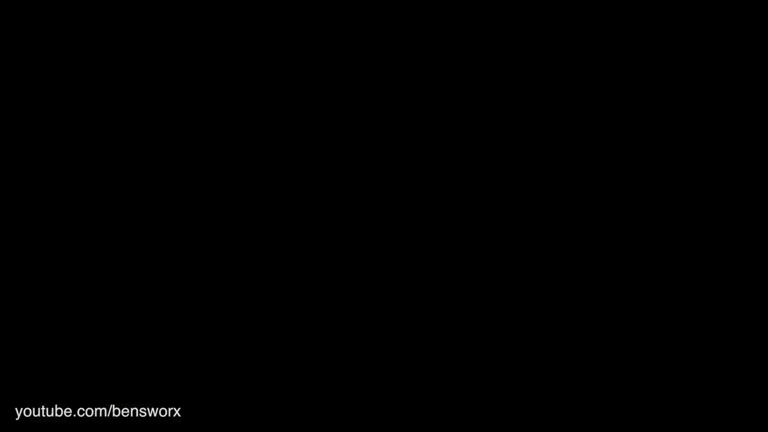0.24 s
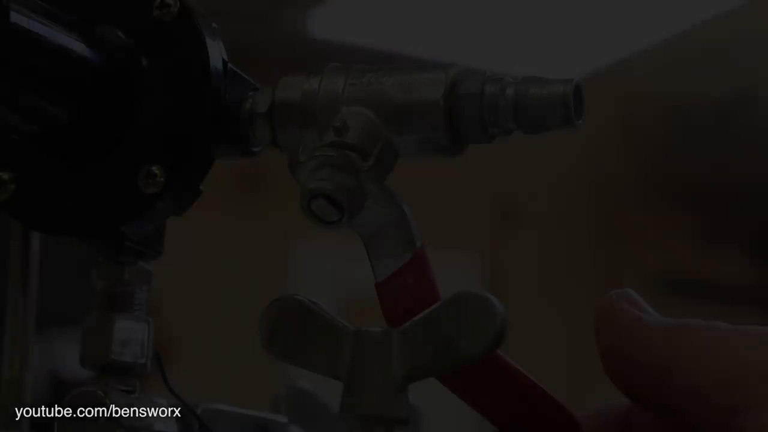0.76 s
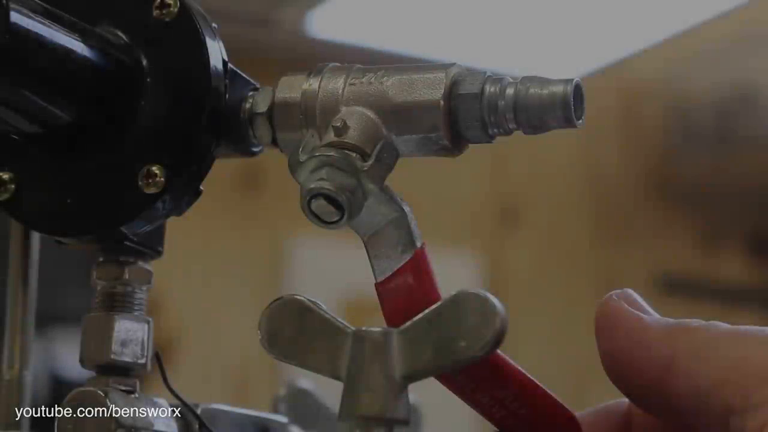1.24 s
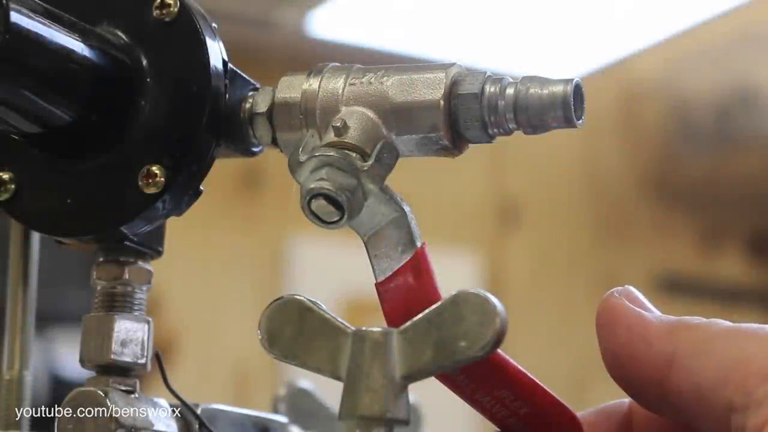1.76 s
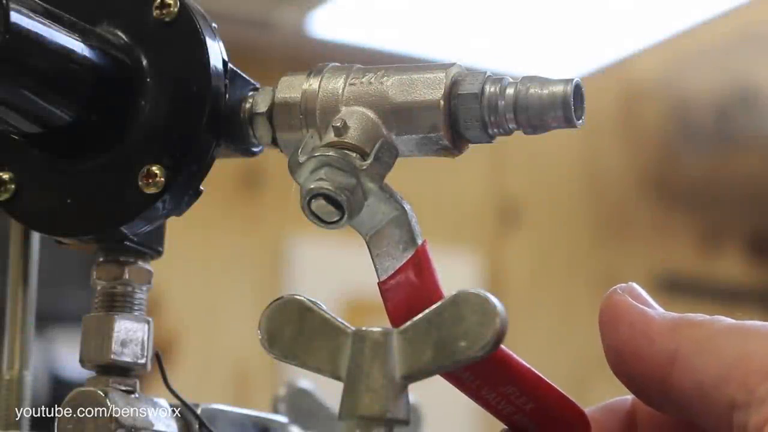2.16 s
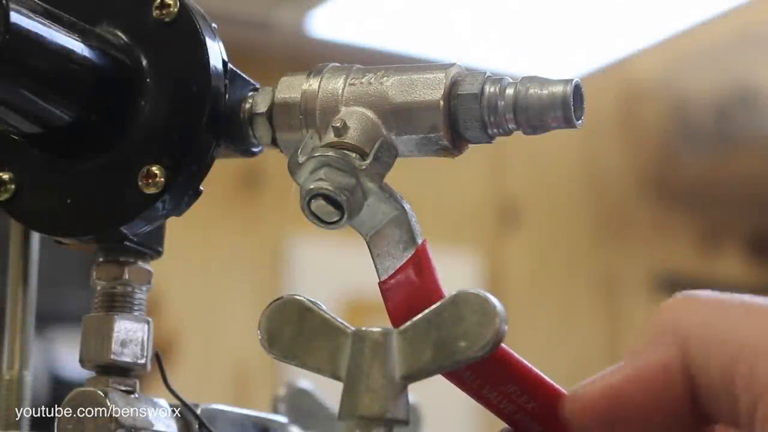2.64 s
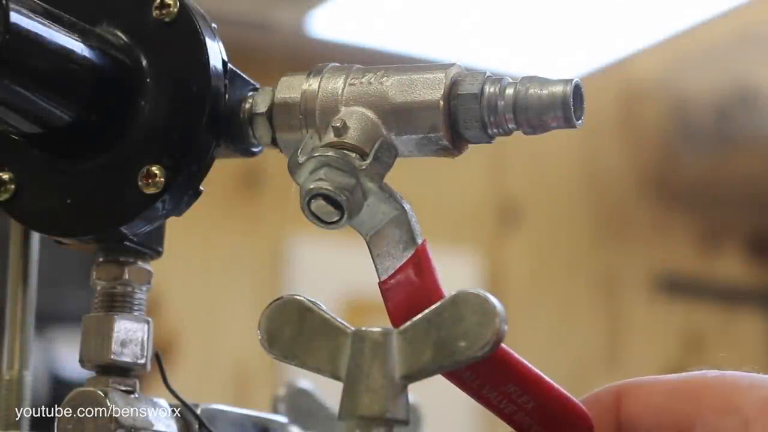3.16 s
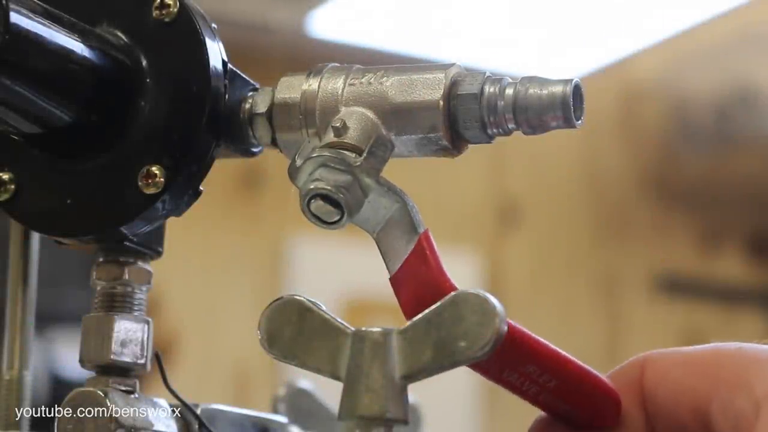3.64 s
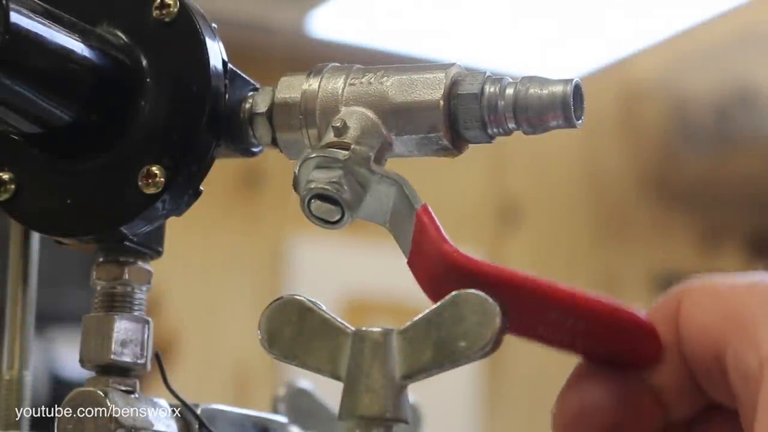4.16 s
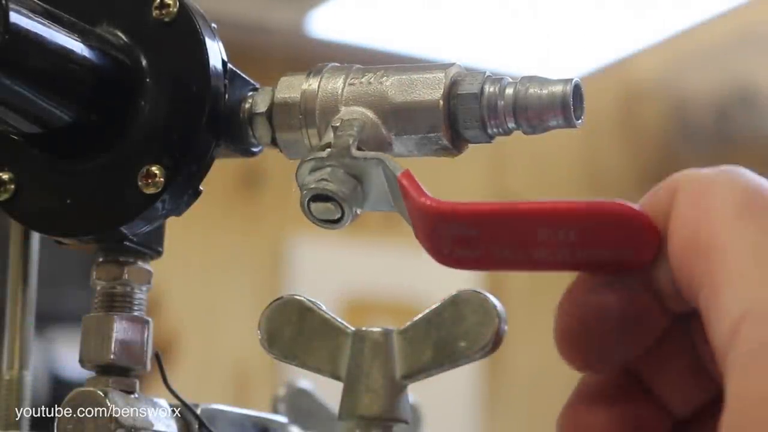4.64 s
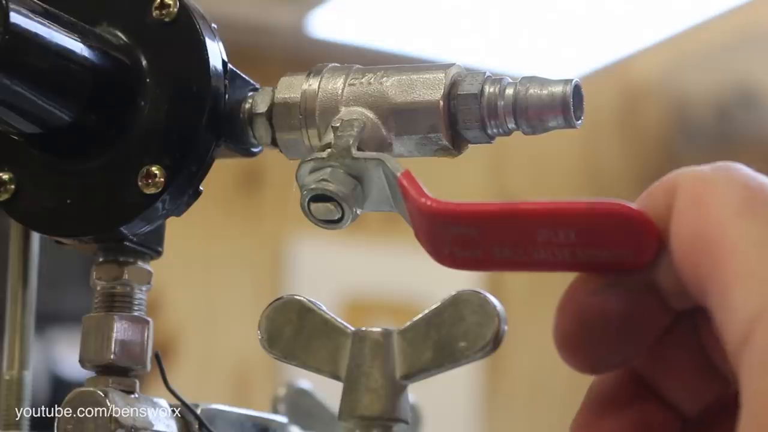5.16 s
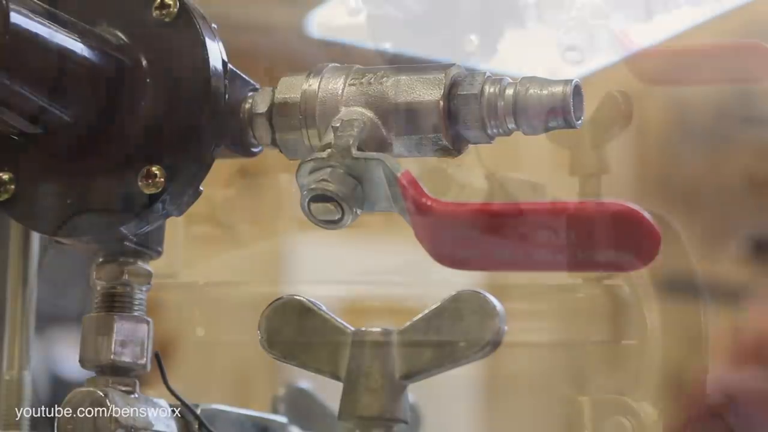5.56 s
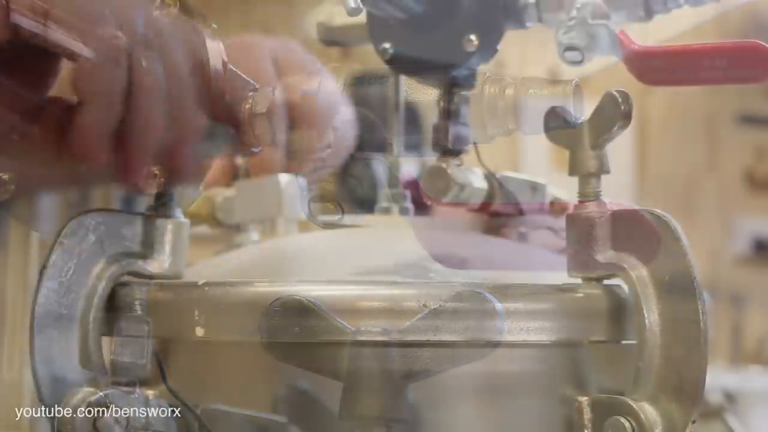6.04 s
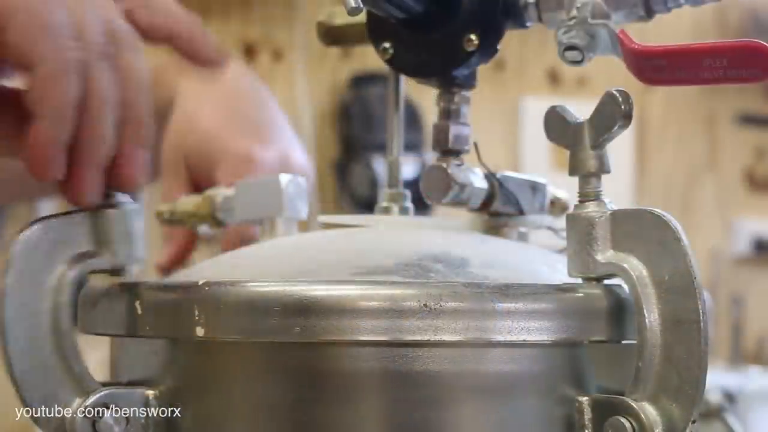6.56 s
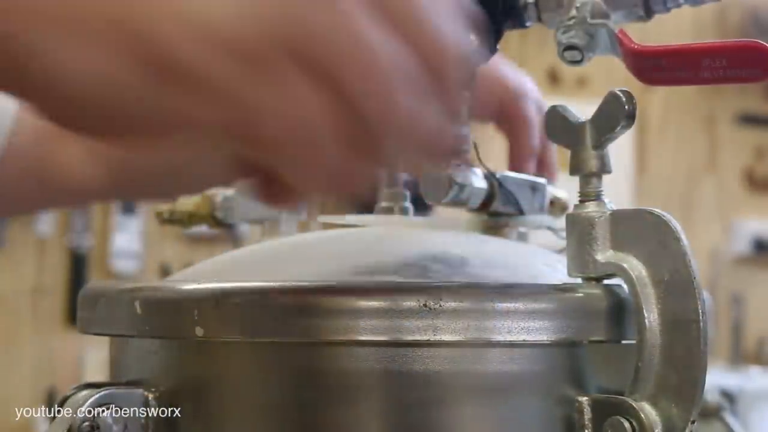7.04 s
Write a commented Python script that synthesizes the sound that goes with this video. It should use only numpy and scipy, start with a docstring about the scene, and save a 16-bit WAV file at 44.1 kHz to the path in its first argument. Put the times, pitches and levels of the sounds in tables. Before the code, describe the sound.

Close mono sound in a small workshop, over very faint hum, rumble and hiss. From 0 s a thin, bright jet of air sizzles from a barely open valve, starting weak and strengthening until about 2.6 s. Around 2.75 s it is fullest, broader and less piercing; from 3.3 s its colour shifts as the passage turns, and after 3.7 s it drops sharply, losing treble. By 4.3 s it is a soft, hollow rush, with a slight surge near 4.55 s and a dull lever knock at 4.7 s, then a sigh fading with a faint airy tone. From 5.55 s light screw ticks begin, with gritty rubbing and tiny high squeaks. Steel clanks at 5.9 s, harder at 6.36 s, then two overloaded crashes at 6.71 and 6.96 s, each short, bright and ringing. Dull hand bumps and small scrapes close it by 7.3 s.

```python
"""A ball valve on a pressure pot is eased open: shaped noise hisses through the slit, then sighs through the bore.
The lever knocks its stop in a few damped modes. A wing nut is unscrewed with ticks, rubbing made of random
slips, and tiny wavering squeaks. A steel clamp drops off the lid and clanks against the pot: noise bursts over
ringing modes, with dull bumps of the hands. A close mono microphone in a small workshop adds a short tail over
low hums, rumble and faint hiss; the two hardest clanks overload it."""
import sys
import numpy as np
from scipy import signal
from scipy.fft import rfft, irfft
from scipy.io import wavfile
from scipy.ndimage import uniform_filter1d

SR = 44100
rng = np.random.default_rng(int(sys.argv[2]) if len(sys.argv) > 2 else 0)


def pcm_store(signal):
    """Save signal as 16-bit PCM."""
    levels = np.round(np.clip(np.atleast_2d(signal), -1, 1) * 32767)
    wavfile.write(sys.argv[1], SR, levels.astype(np.int16).T)


N = 321930
TIME = np.arange(N) / SR
SIGH_S = 4.555  # the last of the pressure starts to die away

# spectrum of a metal contact, for blows and thread grit: f/Hz, relative level/dB
CONTACT_SPECTRUM = [(60, -9), (200, -3), (400, 1.5), (800, 1.5), (1300, -1), (1550, -2.5), (2100, 4),
                    (2600, -1.5), (3250, -1.5), (4500, 3), (6000, -4), (7500, -3.5), (10500, -10.5),
                    (16000, -24.5)]


def undb(db):
    """Decibels to gain."""
    return 10 ** (np.asarray(db) / 20)


def curve(rows, t):
    """The other columns of a table where its first column (time or opening) is t."""
    s, *columns = np.transpose(rows)
    return [np.interp(t, s, c) for c in columns]


def unit(x):
    """Scale to rms 1."""
    return x / np.sqrt(np.mean(x ** 2))


def slope(points, f):
    """A spectrum of (Hz, dB) points, in dB at frequencies f."""
    hz, db = np.transpose(points)
    return np.interp(np.log(f + 1), np.log(hz), db)


def bell(f, hz, width):
    """A hump of height 1 with the given full width at half height."""
    return 2 ** -((2 * (f - hz) / width) ** 2)


def bins(n):
    """Frequencies of the spectrum of n samples."""
    return np.fft.rfftfreq(n, 1 / SR)


def colour(x, db):
    """Causal (minimum-phase) filter with the given dB at each frequency bin."""
    cepstrum = irfft(np.log(undb(db)), len(x))
    # fold the cepstrum onto positive time
    cepstrum[1:len(x) // 2] *= 2
    cepstrum[len(x) // 2 + 1:] = 0
    return irfft(rfft(x) * np.exp(rfft(cepstrum)), len(x))


def band_db(db, f, lo, hi):
    """Level that white noise of rms 1 has between lo and hi after this filter."""
    in_band = (f > lo) & (f < hi)
    return 10 * np.log10(np.mean(undb(db) ** 2 * in_band, axis=-1, keepdims=True))


def add(out, s, x):
    """Mix x into out from time s."""
    i = int(s * SR)
    out[i:i + len(x)] += x[:N - i]


def airflow(t, surge_s=0.12, surge_db=1.5, sigh_db_per_s=16, dull_db_per_s=14,
            rush_base_db=-19, rush_opening=1.76, rush_gain_db=8.5):
    """Valve opening and the jet's level, low rush and treble in dB; after a surge the emptying pot sighs out."""
    # the jet until the bore lines up: t/s, relative level/dB, treble against the middle/dB
    jet_levels = [(0.03, -37, 7.5), (0.53, -31, 6.5), (1.24, -26.5, 6), (2.61, -24.5, 3.5),
                  (2.75, -23.5, 1), (3.29, -25.5, 0.5), (3.63, -27, -1), (3.66, -25, -6),
                  (4.16, -37.5, -10), (4.3, -40, -8.5)]
    # the lever: t/s, opening (0 slit, 1 cracked, 2 half open, 3 full bore)
    lever_path = [(0, 0), (2.6, .4), (2.82, 1), (3.25, 1.1), (3.68, 1.55), (3.9, 2), (4.28, 2.15),
                  (4.44, 3)]
    opening, = curve(lever_path, t)
    level_db, treble_db = curve(jet_levels, t)
    spent = np.maximum(t - SIGH_S, 0)
    level_db = level_db + surge_db * bell(t, SIGH_S, surge_s) - sigh_db_per_s * spent
    # low rush and treble fade faster than the middle
    dull_db = dull_db_per_s * np.maximum(t - jet_levels[-1][0], 0)
    # the rush gains over half a step of opening
    rush_db = rush_base_db + rush_gain_db * np.clip(2 * (opening - rush_opening), 0, 1)
    return opening, level_db, rush_db - dull_db, treble_db - dull_db


def outlet(t, opening, open_db=3.5, gain_db_per_s=17.5, emerge_s=0.77):
    """Pitch and height in dB of the outlet's lowest tone, which stands out more as the flow dies."""
    # the tone wanders: t/s, f/Hz
    outlet_pitch = [(3.7, 1380), (4.35, 1160), (4.52, 1370), (4.95, 1280), (5.2, 1160), (5.7, 1280)]
    hz = curve(outlet_pitch, t)[0]
    emerging_db = gain_db_per_s * np.clip(t - SIGH_S, 0, emerge_s)
    return hz, open_db * np.clip(opening - 1, 0, 1) + emerging_db


def hiss(low_hz=650, body_hz=1400, edge_hz=3600, treble_hz=6200, chamber_width=400, outlet_width=220,
         notch_width=260, flutter_db=0.52, deepen=0.078, size=512):
    """Jet noise through the valve passage, whose resonances change as the ball turns; it dulls as it dies."""
    # turbulence of the jet: f/Hz, relative level/dB
    turbulence = [(60, -22), (200, -17), (400, -12.5), (800, -5.5), (1300, 2), (2500, 1), (4500, -0.5),
                  (8500, -7), (12000, -7), (14700, -16), (15800, -21)]
    # resonances and notches of the passage at each opening: f/Hz, width/Hz, height/dB before deepening
    slit = [(1460, 280, -0.5), (2900, 420, -5), (4400, 380, 3), (6040, 650, 4), (7140, 1700, 11),
            (9360, 660, 8), (10400, 450, 12), (11130, 490, 14.5), (11340, 270, -29), (11850, 300, 0),
            (13750, 1650, 20)]
    cracked = [(3460, 1300, 9), (4360, 400, 4.5), (4970, 1370, 5.5), (6120, 210, 8), (7000, 1040, 8),
               (8040, 370, -5), (9150, 1000, -3.5), (10230, 850, 11), (10740, 370, 11), (11150, 800, -8),
               (14100, 950, 13.5)]
    half_open = [(1260, 350, 2), (2850, 300, -2), (3230, 340, 5), (3680, 450, 8), (4780, 620, -2.5),
                 (5900, 340, 5), (7020, 770, 17), (8680, 390, 13), (10570, 660, 9), (12900, 1500, 10)]
    full_bore = [(320, 190, -3), (630, 260, -8), (1290, 490, 7.5), (2310, 380, 10.5), (3290, 210, 12),
                 (4170, 430, 15), (5840, 490, 14.5), (7370, 470, 14.5), (9280, 190, 11), (11080, 380, 10),
                 (12100, 400, 15), (12940, 920, 15)]
    # the chamber inside the ball rings lower as the bore lines up: opening, f/Hz, height/dB
    chamber = [(1.4, 5250, -1), (2.15, 5000, -6), (2.5, 4800, 12), (3, 4280, 5.5)]
    # the notch of the slit moves, climbing overall as it widens: opening, f/Hz, height/dB
    notch = [(0, 5600, -3), (.4, 5420, -5), (.75, 5750, -4), (1.1, 6450, -2)]
    # reflections from surfaces near the valve: delay/ms, gain
    reflections = [(1.36, .08), (1.8, -.08), (7.03, .07), (8.97, .045)]

    overlap = size - size // 4
    f, t, noise = signal.stft(rng.standard_normal(N), SR, nperseg=size, noverlap=overlap)
    frame_t = t[:, None]
    opening, level_db, rush_db, treble_db = airflow(frame_t)

    db = slope(turbulence, f)
    for stage, passage in enumerate([slit, cracked, half_open, full_bore]):
        # crossfade between neighbouring stages
        share = np.maximum(1 - abs(np.clip(opening, 0, 3) - stage), 0)
        # the passage tunes slightly upward as it opens
        stretch = 1 + 0.013 * (opening - stage)
        # its resonances deepen as the valve nears half open
        depth = 1 + deepen * np.clip(opening - 1, 0, 1)
        shape = sum(peak_db * bell(f, hz * stretch, width) for hz, width, peak_db in passage)
        db = db + share * depth * shape
    moving = [curve(chamber, opening), outlet(frame_t, opening), curve(notch, opening)]
    for (hz, peak_db), width in zip(moving, [chamber_width, outlet_width, notch_width]):
        db = db + peak_db * bell(f, hz, width)

    # a fast jet is bright, a slow one mostly rushes
    low = band_db(db, f, 350, 900)
    mid = band_db(db, f, 1000, 5000)
    high = band_db(db, f, 6000, 15000)
    db = db + (rush_db - low + mid) * slope([(low_hz, 1), (body_hz, 0)], f)
    db = db + (treble_db - high + mid) * slope([(edge_hz, 0), (treble_hz, 1)], f)

    flutter = unit(uniform_filter1d(rng.standard_normal(len(t)), 10))[:, None]
    gain = undb(db - mid + level_db + flutter_db * flutter)
    air = signal.istft(noise * gain.T, SR, nperseg=size, noverlap=overlap)[1][:N]
    return air + sum(g * np.interp(TIME - ms / 1000, TIME, air, left=0) for ms, g in reflections)


def hum(waver=0.16, drift=0.0037, count=40):
    """Low tones that swell and fade, wavering in pitch and strength."""
    # middle t/s, length/s, f/Hz, level/dB before the swell
    hum_tones = [(0, 1.5, 168, -60), (2.2, 2.4, 167, -61), (2.95, 1.2, 56, -56.5), (4.1, 2.2, 57.5, -62),
                 (4.3, 2.6, 157.3, -50), (7, 1.3, 175, -54)]
    out = 0
    for s, length, hz, db in hum_tones:
        knots = np.linspace(0, TIME[-1], count)
        sway = np.interp(TIME, knots, rng.standard_normal(count))
        bend = np.interp(TIME, knots, rng.standard_normal(count))
        phase = 2 * np.pi * np.cumsum(hz * (1 + drift * bend)) / SR
        tone = (1 + waver * sway) * np.sin(phase)
        out = out + undb(db) * bell(TIME, s, length) * unit(tone)
    return out


def ambient(hiss_db=-61.5, rumble_db=-59, swell_db=6.5, swell_s=4.25, swell_length_s=3.2):
    """A rumble that swells once, under the microphone's own steady faint hiss."""
    # low background rumble: f/Hz, relative level/dB
    rumble_spectrum = [(20, -1.5), (42, -13), (70, -8.5), (97, 3.5), (135, -2), (180, 2.5), (250, -6),
                       (320, 0), (430, -11.5), (700, -17.5), (2000, -49), (16000, -83)]
    # the microphone's hiss: f/Hz, relative level/dB
    mic_spectrum = [(100, 3), (1500, 2), (4000, 1), (8000, .3), (16000, 0)]
    f = bins(N)
    rumble = unit(colour(rng.standard_normal(N), slope(rumble_spectrum, f)))
    steady = unit(colour(rng.standard_normal(N), slope(mic_spectrum, f)))
    swelling_db = rumble_db + swell_db * bell(TIME, swell_s, swell_length_s)
    return rumble * undb(swelling_db) + undb(hiss_db) * steady


def lever_stop(at_s=4.711, level_db=-37, push_s=.001, size=8192):
    """The lever meets its stop; the hand softens and damps the knock."""
    # modes of the held lever: f/Hz, relative level/dB, t60/s
    held_modes = [(352, -4, .13), (425, -3, .1), (530, -2, .08), (650, -5, .06), (1350, -4, .04)]
    out, t = np.zeros(N), TIME[:size]
    ring = sum(undb(db - 60 * t / t60) * np.sin(2 * np.pi * hz * t) for hz, db, t60 in held_modes)
    add(out, at_s, undb(level_db) * ring * (1 - np.exp(-t / push_s)))
    return out


def blows(clamp_t60=0.062, tick_thud_db=-9.5, tick_treble_db=-17.5, tick_hz=3280, tick_ring_db=12.5,
          tick_t60=0.043):
    """Clamp blows and nut ticks as (s, level dB, thud dB, treble dB, resonance Hz, its dB, t60 s)."""
    # clamp on lid and pot, all levels relative:
    # t/s, level/dB, thud/dB, treble/dB, strongest resonance f/Hz, its height/dB
    clamp_blows = [(5.903, -11, -16.5, -23, 2370, 16), (6.014, -15, -24, -11.5, 4300, 1),
                   (6.038, -17, -20, -18, 2240, 11), (6.053, -20.5, -9, -7, 3150, 10),
                   (6.362, -4.5, -14.5, -13, 1400, 9), (6.411, -20, -13, -34, 1870, 11),
                   (6.67, -13, -16, -11, 1970, 12), (6.69, -19, 0, -7, 2000, 9),
                   (6.7, -12, -37, -18, 2060, 11), (6.709, 3.5, -18, -12.5, 3300, 10.5),
                   (6.876, -13.5, -13, -8.5, 3300, 14), (6.936, -20.5, -15, -29, 1940, 14),
                   (6.957, 4.5, -21.5, -12, 3230, 9), (7.104, -23, -10, -17, 2160, 2)]
    # the wing nut catching on its screw: t/s, relative level/dB
    nut_ticks = [(5.566, -35.5), (5.641, -33.5), (5.682, -33), (5.722, -30), (5.818, -36.5), (5.848, -25.5),
                 (5.977, -30.5), (6.102, -27), (6.126, -31), (6.173, -40), (6.184, -25.5), (6.242, -25.5),
                 (6.294, -30), (6.338, -32), (6.447, -23), (6.483, -21), (6.542, -36), (6.586, -27.5),
                 (6.605, -28.5), (7.205, -43)]
    clamp = [(*row, clamp_t60) for row in clamp_blows]
    # the ticks share one colour and decay
    tick = (tick_thud_db, tick_treble_db, tick_hz, tick_ring_db, tick_t60)
    nut = [(s, db, *tick) for s, db in nut_ticks]
    return clamp + nut


def knocks(crack_db=-7, ring_db=-27, thud_db=12, bright_db=12, scatter_db=3.5, ring_width=520, hardness=0.46,
           tick_db=2, tick_s=0.00022, treble_damping=0.91, size=16384):
    """Each blow is a sharp-edged noise burst, like dense damped modes, over the ring of clamp and pot."""
    # modes of clamp and pot: f/Hz, relative level/dB, t60/s
    steel_modes = [(236, -2, 0.12), (357, -8, .14), (614, 6, 0.063), (1280, -5, .12), (1600, -38, .2),
                   (1927, 5, 0.1), (2100, 2, 0.2), (2190, -19, 0.11), (2650, -4.5, 0.18), (3100, -20, 0.12),
                   (3380, 1, 0.053), (4320, 6, 0.11), (4560, -6.5, 0.19), (4500, -18.5, 0.13),
                   (5000, -4.5, 0.1), (5780, -2.5, 0.12), (6610, 4.5, 0.099), (7700, -1, 0.083),
                   (7660, -35, .14), (10420, -19, 0.12), (12800, -42, 0.13)]
    out, t, f = np.zeros(N), TIME[:size], bins(size)
    mode_hz, mode_db, mode_t60 = np.transpose(steel_modes)[:, :, None]
    for s, peak_db, low_db, high_db, main_hz, main_db, t60 in blows():
        # a harder blow is a shorter contact and reaches higher
        top_db = high_db + bright_db
        extreme_db = top_db + hardness * (peak_db + 2)
        contact_points = [(700, low_db + thud_db), (1800, 0.0045), (5000, 0), (7500, top_db), (11000, extreme_db)]
        contact = slope(contact_points, f)
        db = slope(CONTACT_SPECTRUM, f) + contact + main_db * bell(f, main_hz, ring_width)

        # treble and body of the burst decay at different rates
        noise = rng.standard_normal(size)
        dull = irfft(rfft(noise) * (f < 5500))
        burst = dull * undb(-60 * t / t60) + (noise - dull) * undb(-60 * treble_damping * t / t60)
        # the first instant is stressed as a tick
        burst = burst * undb(tick_db * np.exp(-t / tick_s))
        crack = colour(burst, db - band_db(db, f, 0, SR / 2))

        # every point of contact favours other modes: random sign, level and tuning
        chance = rng.standard_normal((len(mode_hz), 3))[:, :, None]
        strength_db = mode_db + scatter_db * chance[:, 1] + np.interp(mode_hz, f, contact)
        strength = np.sign(chance[:, 0]) * undb(strength_db)
        tuned_hz = mode_hz * (1 + 0.0094 * chance[:, 2])
        ring = strength * np.sin(2 * np.pi * tuned_hz * t) * undb(-60 * t / mode_t60)
        add(out, s, undb(peak_db) * (undb(crack_db) * crack + undb(ring_db) * ring.sum(axis=0)))
    return out


def squeaks(waver=.009):
    """Now and then the dry thread sings for an instant: a short sine with unsteady pitch."""
    # t/s, length/s, f/Hz, level/dB
    squeak_notes = [(5.73, 0.0093, 13050, -54), (5.96, 0.035, 6420, -51), (5.964, .045, 11030, -65),
                    (6.305, .025, 11050, -65), (6.375, .04, 12900, -54), (6.556, .05, 11050, -62)]
    out = np.zeros(N)
    for s, length, hz, db in squeak_notes:
        n = int(length * SR)
        pitch = hz * (1 + waver * unit(uniform_filter1d(rng.standard_normal(N), 60))[:n])
        tone = np.sin(2 * np.pi * np.cumsum(pitch) / SR)
        add(out, s, undb(db) * unit(signal.windows.tukey(n, .3) * tone))
    return out


def thread(slips_per_s=1100, spread_db=3.0, grit_db=-36, soft_hz=5000):
    """The wing nut sticks and slips on its screw: uneven tiny clicks ring the clamp."""
    # what the rubbing rings: f/Hz, width/Hz, relative level/dB
    rub_modes = [(233, 66, 1.5), (348, 32, 4), (582, 49, 4), (732, 42, 1), (1170, 200, -10),
                 (2040, 105, -2.5), (3140, 87, -8), (4160, 290, -15), (6600, 220, -19)]
    # strokes of the nut: middle t/s, length/s, level/dB before the swell
    strokes = [(6.03, 0.19, -47), (6.34, 0.37, -37.5), (6.91, 0.53, -44.5)]
    f = bins(N)
    slips = (rng.random(N) < slips_per_s / SR) * rng.standard_normal(N)
    slips = slips * undb(spread_db * rng.standard_normal(N))
    power = sum(undb(db) ** 2 / (1 + (2 * (f - hz) / width) ** 2) for hz, width, db in rub_modes)
    grit = undb(grit_db + slope(CONTACT_SPECTRUM, f)) ** 2
    power = (power + grit) / (1 + (f / soft_hz) ** 2)
    rubbing = unit(colour(slips, 10 * np.log10(power)))
    return rubbing * sum(undb(db) * bell(TIME, s, length) for s, length, db in strokes)


def bumps(gain_db=-9, skirt_db=-31, t60=0.11, size=16384):
    """Soft contacts of the hands wake only the low ring of the pot: dull decaying noise."""
    # t/s, level/dB before gain_db, f/Hz
    hand_bumps = [(6.025, -20, 206), (6.405, -21.5, 330), (6.931, -24, 255), (7.04, -33, 225),
                  (7.14, -29, 205), (7.208, -29, 225), (7.244, -34, 204)]
    out, t, f = np.zeros(N), TIME[:size], bins(size)
    for s, peak_db, hz in hand_bumps:
        db = slope([(hz / 4, -25), (hz, 0), (hz * 4, skirt_db), (hz * 30, -60)], f)
        burst = rng.standard_normal(size) * undb(-60 * t / t60)
        add(out, s, undb(peak_db + gain_db) * colour(burst, db - band_db(db, f, 0, SR / 2)))
    return out


def workshop(x, wet_db, t60_low=0.21, t60_mid=0.51, t60_high=0.51, build_s=0.015, size=32768):
    """The direct sound and a short diffuse tail from wooden walls, noise decaying in three bands."""
    t, f = TIME[:size], bins(size)
    noise, tail = rfft(rng.standard_normal(size)), 0
    edges = [0, 1500, 7000, SR]  # Hz
    for lo, hi, t60 in zip(edges, edges[1:], [t60_low, t60_mid, t60_high]):
        tail = tail + irfft(noise * ((f >= lo) & (f < hi))) * undb(-60 * t / t60)
    tail = tail * (1 - np.exp(-t / build_s))
    wall_db = slope([(200, -13.5), (1000, 2.5), (2500, 0.0), (5000, 2.5), (9000, -4.5), (15000, -7)], f)
    tail = colour(tail / np.sqrt(np.sum(tail ** 2)), wall_db)
    return x + undb(wet_db) * signal.fftconvolve(x, tail)[:N]


def scene(hiss_db=-1.0):
    """Air and metal in the same workshop, over its hum; both channels carry one microphone."""
    air = workshop(undb(hiss_db) * hiss(), wet_db=-8.5)
    metal = workshop(lever_stop() + knocks() + bumps() + thread() + squeaks(), wet_db=-15.5)
    return np.tile(air + metal + hum() + ambient(), (2, 1))


def record(dry, top_hz=15900):
    """The recorder clips at full scale, then cuts the top with a steep low-pass."""
    top_cut = signal.ellip(12, .1, 80, top_hz, fs=SR, output="sos")
    return signal.sosfilt(top_cut, np.clip(dry, -1, 1))


dry = scene()
out = record(dry)
pcm_store(out)
```